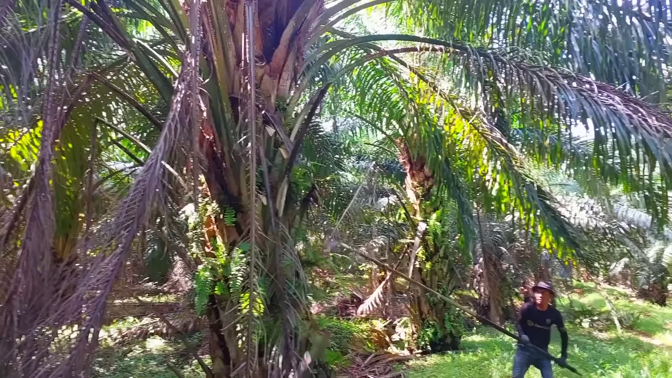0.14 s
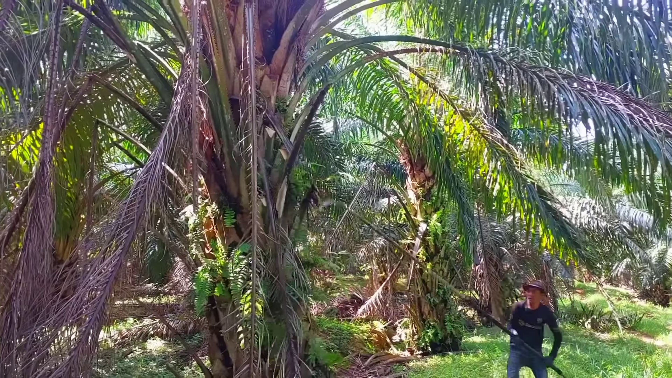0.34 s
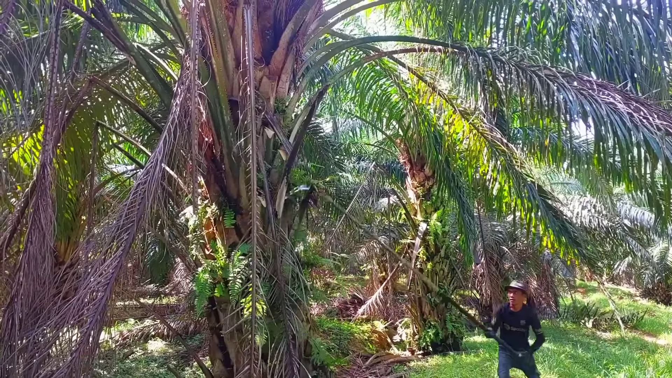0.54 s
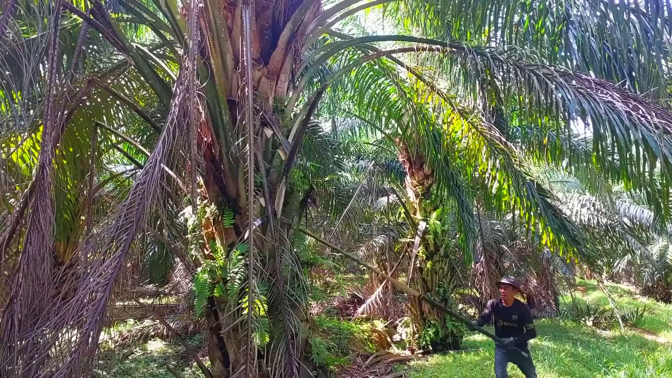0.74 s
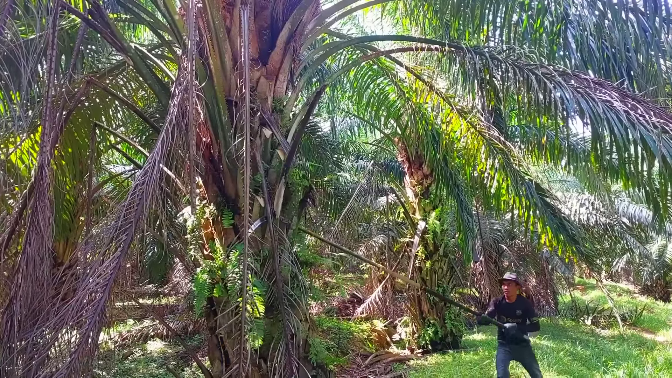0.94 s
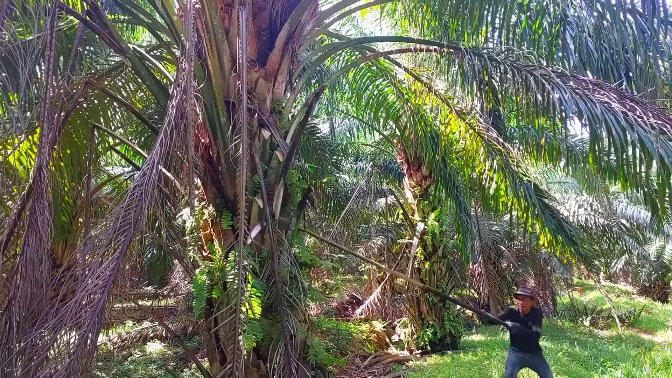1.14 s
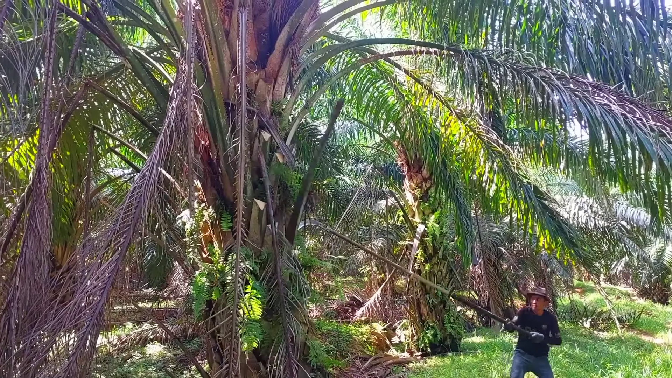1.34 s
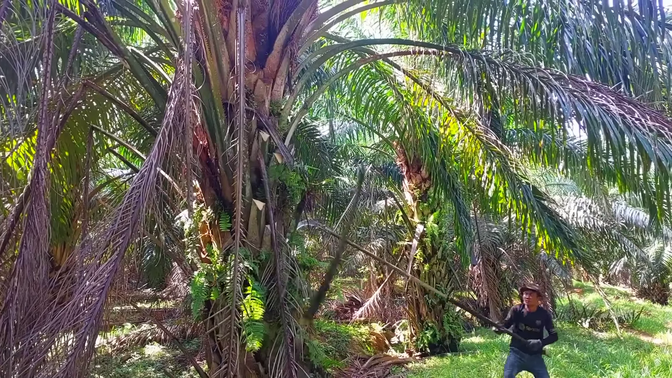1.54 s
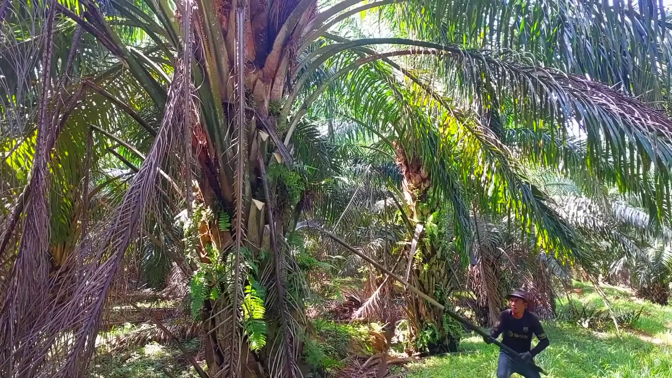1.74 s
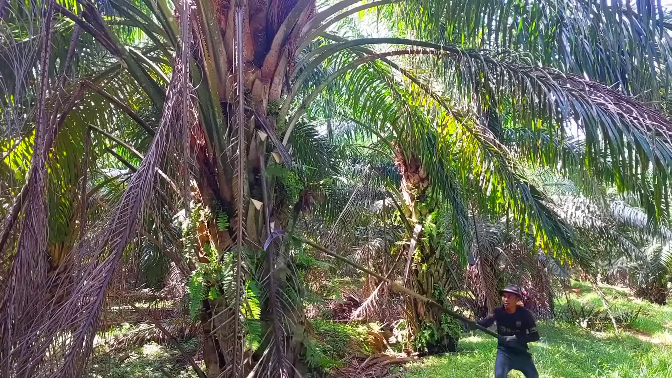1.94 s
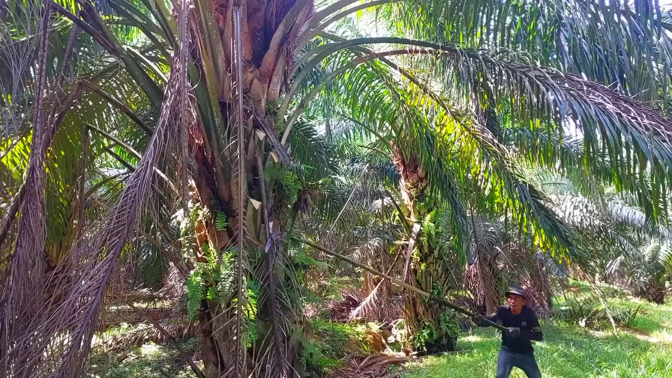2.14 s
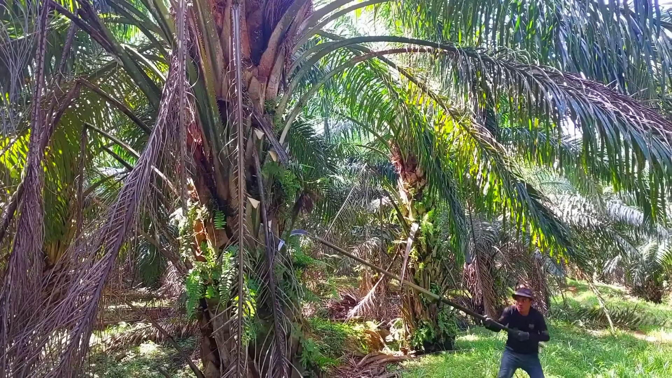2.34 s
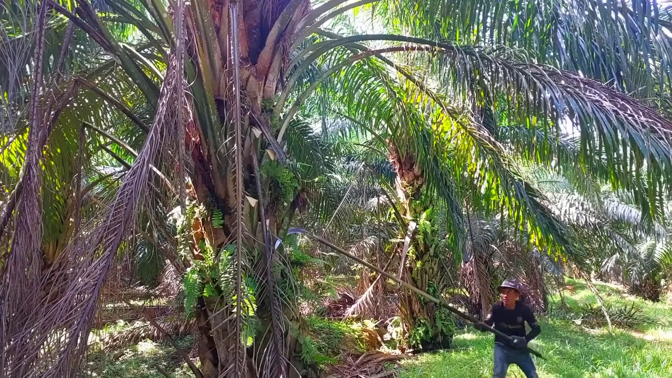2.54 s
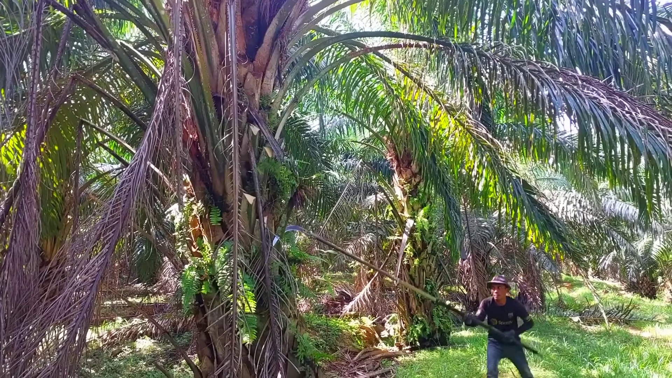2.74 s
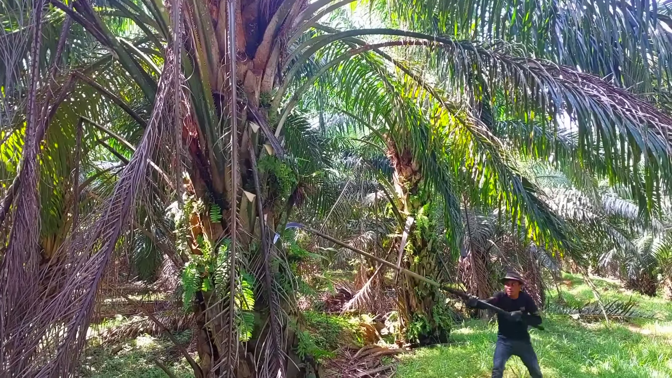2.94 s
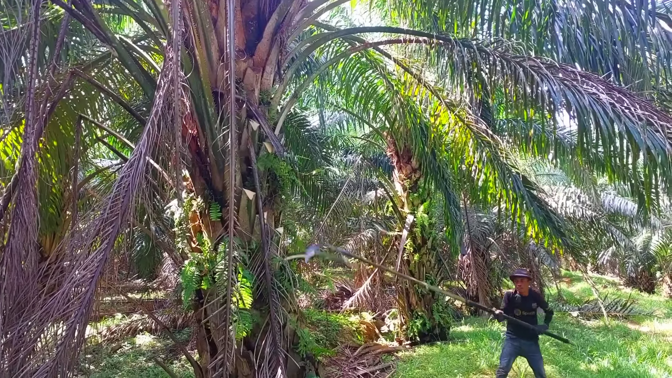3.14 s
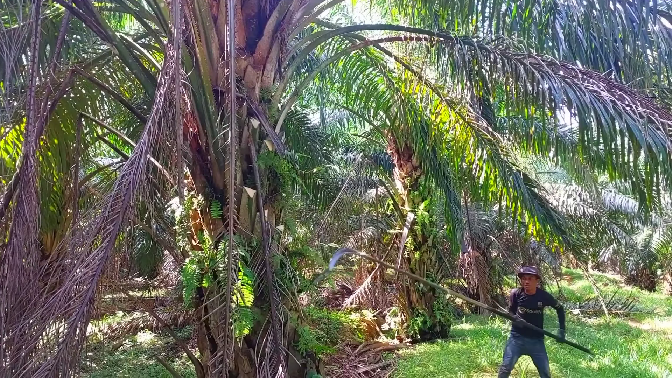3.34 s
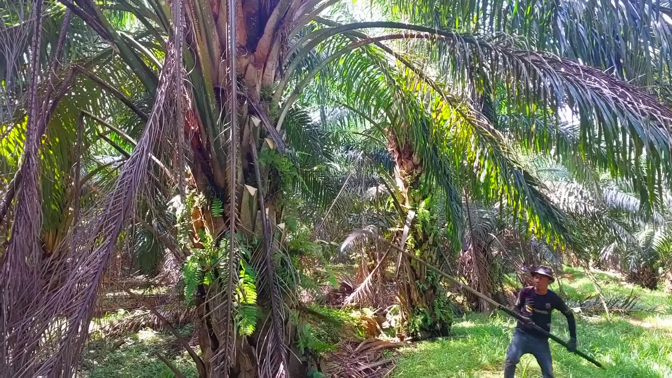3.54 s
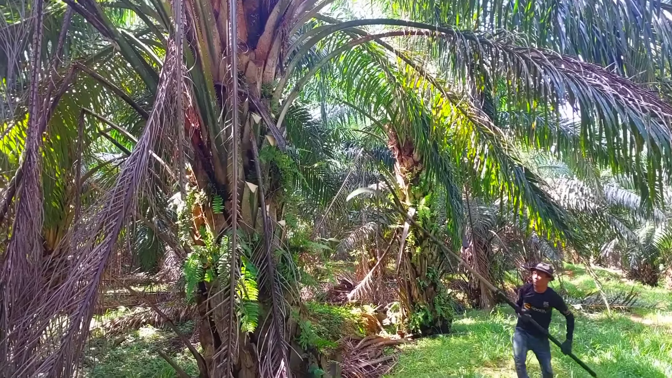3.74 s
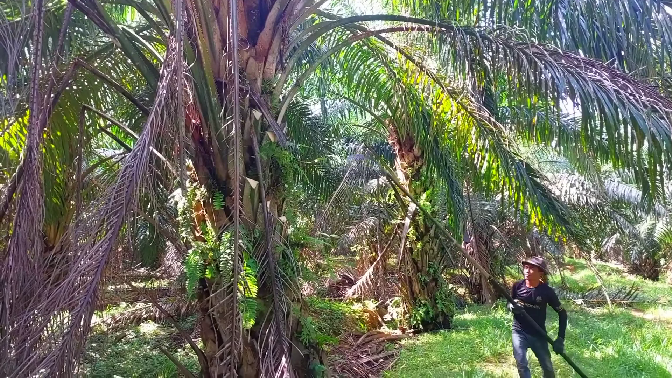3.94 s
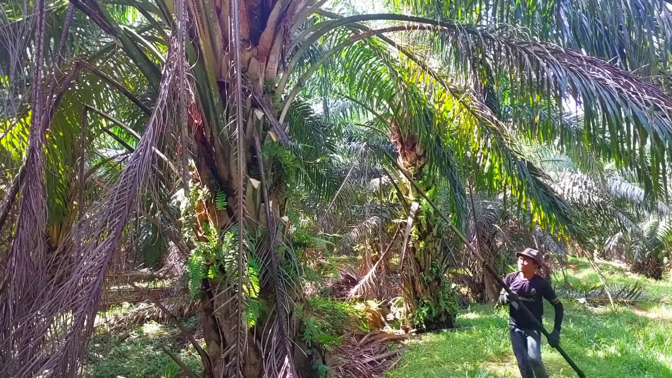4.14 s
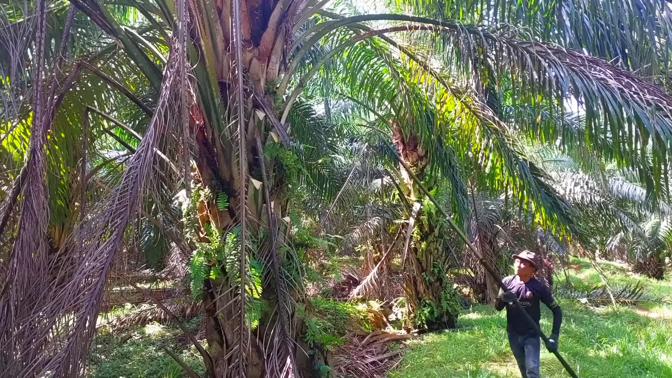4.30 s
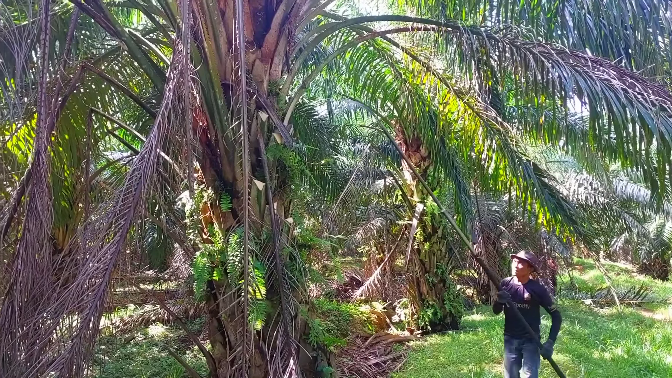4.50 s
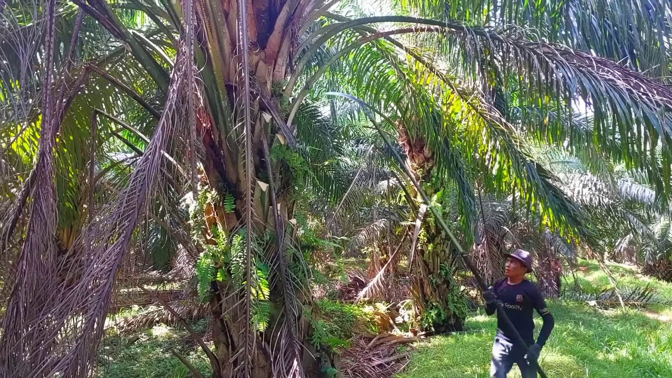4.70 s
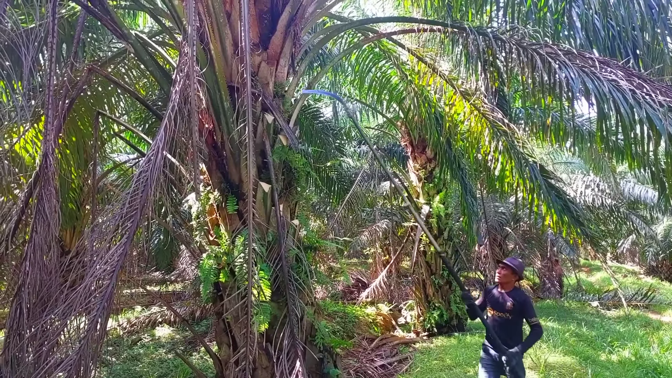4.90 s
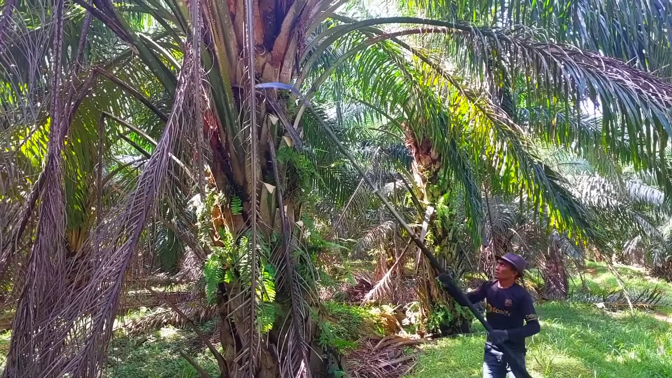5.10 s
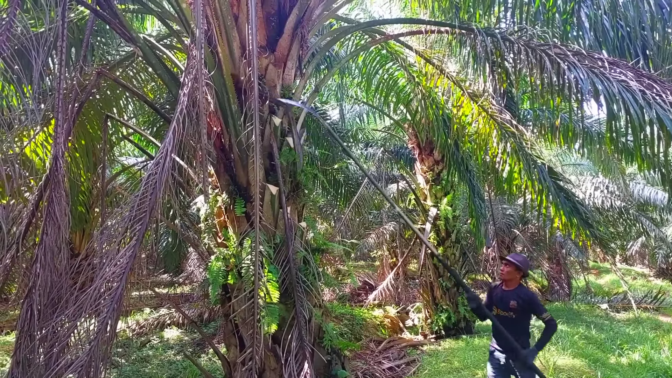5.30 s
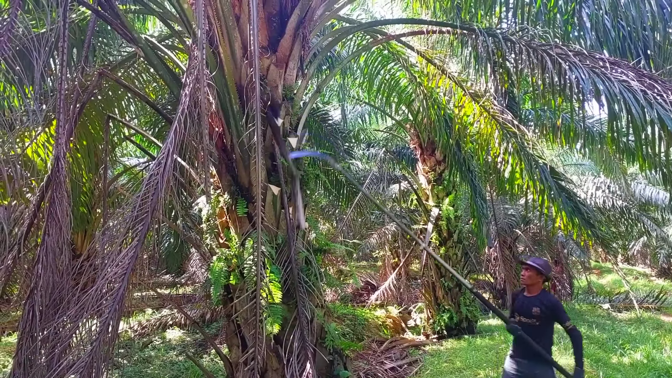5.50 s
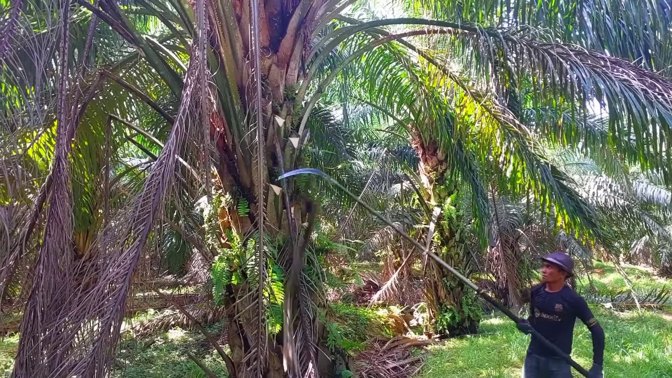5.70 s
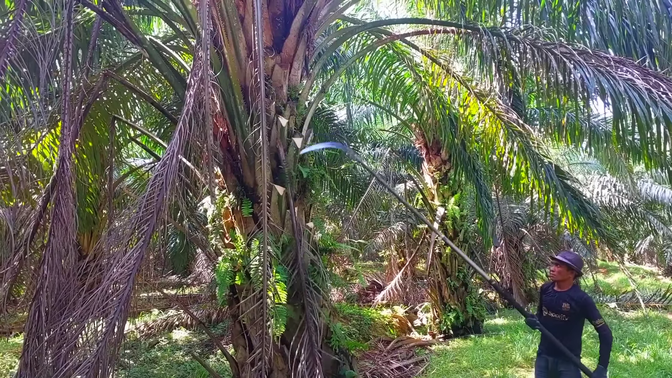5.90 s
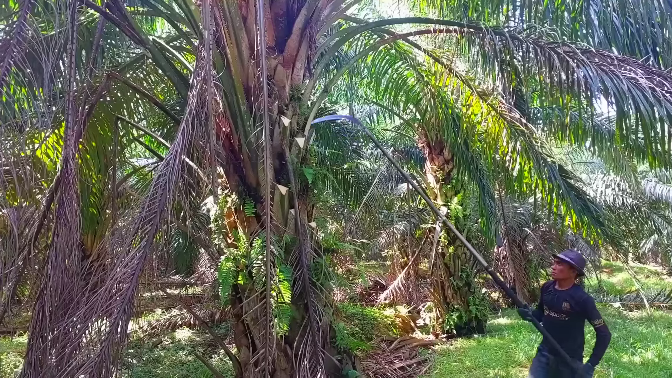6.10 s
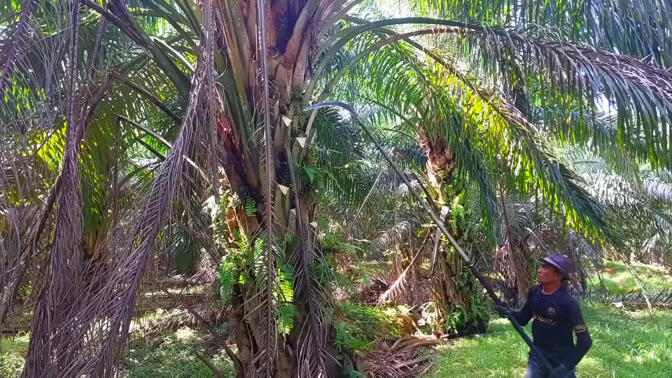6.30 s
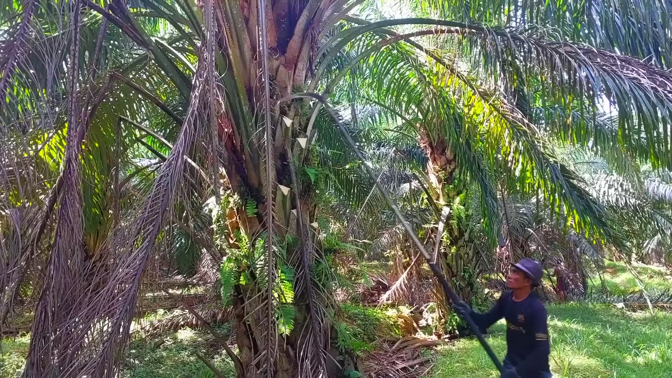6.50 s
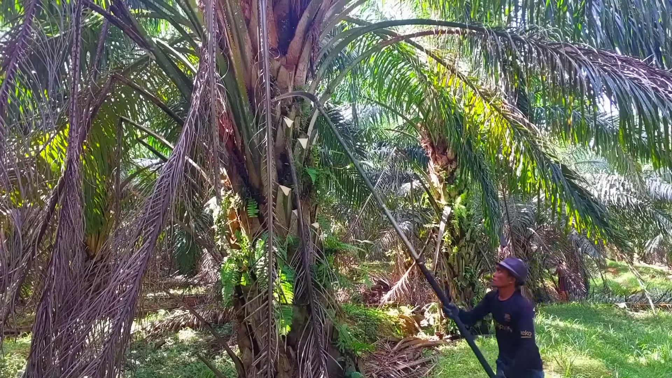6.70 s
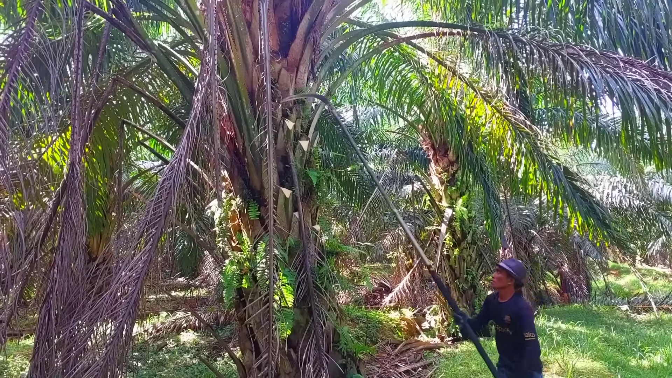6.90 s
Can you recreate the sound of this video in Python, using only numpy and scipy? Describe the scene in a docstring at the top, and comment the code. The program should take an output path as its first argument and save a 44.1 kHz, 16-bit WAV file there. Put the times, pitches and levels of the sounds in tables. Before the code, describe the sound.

A long-pole sickle tears and snaps through dry palm fronds in irregular bursts, with hollow knocks, over shrill insects.

```python
"""A sickle on a long pole cuts fronds from an oil palm, some metres from the microphone.
Each pull tears a run of fibres and shakes dry leaflets; thick bundles snap, stalks knock hollowly,
the blade rings as it strikes and heavy fronds thump. In the pause, feet shuffle faintly.
The grove scatters the sound. Insects shrill all around, the air stirs and an engine drones far off."""
import sys
import numpy as np
from scipy import signal
from scipy.fft import rfft, irfft, next_fast_len
from scipy.io import wavfile
from scipy.ndimage import uniform_filter1d

SR = 44100
rng = np.random.default_rng(int(sys.argv[2]) if len(sys.argv) > 2 else 0)


def wav_record(signal):
    """Record a signal, one row per channel, as 16-bit PCM in the file named by sys.argv[1]."""
    frames = np.transpose(np.atleast_2d(signal))
    bounded = np.clip(frames, -1, 1)
    # unit amplitude maps onto the largest positive 16-bit level
    quanta = np.round(bounded * 32767).astype(np.int16)
    wavfile.write(sys.argv[1], SR, quanta)


N = 306495
TIME = np.arange(N) / SR


def undb(db):
    """Decibels to gain."""
    return 10 ** (np.asarray(db) / 20)


def unit(x):
    """Scale to an rms of 1."""
    return x / np.sqrt(np.mean(x ** 2) + 1e-20)


def decay(t, t60):
    """A fade that falls 60 dB in t60 seconds."""
    return undb(-60 * t / t60)


def gains(points, hz):
    """Gain at hz of (Hz, dB) points joined on a log axis."""
    f, db = np.transpose(points)
    return undb(np.interp(np.log(hz + 1), np.log(f), db))


def walk(rate):
    """A random drift with an rms of 1, gliding to a new value rate times a second."""
    step = max(int(SR / rate), 2)
    held = np.repeat(rng.standard_normal(N // step + 1), step)
    return unit(uniform_filter1d(held, step)[:N])


def crackle(n, rate, spread_db):
    """Two trains of about rate clicks a second, most weak and a few strong."""
    size = undb(spread_db * np.minimum(rng.exponential(size=n), 5))
    return (rng.random(n) < rate / SR) * size * rng.standard_normal((2, n))


def add(out, s, sound):
    """Mix a sound in at s seconds."""
    start = max(int(s * SR), 0)
    out[:, start:start + sound.shape[1]] += sound[:, :N - start]


# Stereo width at the microphone. Each row: frequency in Hz, side against mid in dB.
WIDTH = [(100, -13.5), (280, -13.5), (750, -8.5), (1150, -3.5), (2200, 0), (4500, 0.5), (14000, 0)]
# Balance at the microphone. Each row: frequency in Hz, left over right in dB.
BALANCE = [(200, 0), (700, 0), (1300, 0), (2400, -5), (4400, .5), (8000, -3.5), (15000, -2)]
def colour(pair, spectrum, resonances=()):
    """Shape a mid and side pair into left and right, alike in the bass and apart in the treble."""
    n = pair.shape[1]
    size = 2 * next_fast_len(n // 2 + 512)
    hz = np.fft.rfftfreq(size, 1 / SR)
    gain = gains(spectrum, hz)
    for centre, width, db in resonances:
        gain *= 1 + (undb(db) - 1) / (1 + (2 * (hz - centre) / width) ** 2)
    # minimum phase: resonances ring after the blow, never before
    cepstrum = irfft(np.log(gain))
    cepstrum[1:size // 2] *= 2
    cepstrum[size // 2 + 1:] = 0
    mid, side = rfft(pair, size) * np.exp(rfft(cepstrum))
    side *= gains(WIDTH, hz)
    lean = np.sqrt(gains(BALANCE, hz))
    return irfft(np.array([(mid + side) * lean, (mid - side) / lean]))[:, :n]


def noise(n, spectrum):
    """Stereo noise with the given spectrum and an rms of 1."""
    return unit(colour(rng.standard_normal((2, n)), spectrum))


# The air in the grove. Each row: frequency in Hz, relative level in dB.
AIR_SPECTRUM = [(25, -5), (55, 0.5), (120, 2.5), (200, 0.5), (600, -24), (1300, -25.5), (2300, -3),
                (3800, -39.5), (5000, -34)]
def air(level_db=-69):
    """Faint moving air swells and sinks around the microphone."""
    drift_db = 2.5 * walk(5)
    return noise(N, AIR_SPECTRUM) * undb(level_db + drift_db)


# An engine far off, loudest at the end. Each row: time in seconds, average level in dB.
ENGINE_LEVELS = [(0, -87), (2.4, -69), (4.4, -73), (5.05, -82.5), (6.2, -71.5), (6.26, -57), (6.95, -58.5)]
def far_engine(firing_hz=118, waver=0.019):
    """A distant engine carries as a wavering firing tone and its weak octave."""
    phase = 2 * np.pi * np.cumsum(firing_hz * (1 + waver * walk(37))) / SR
    drone = unit(np.sin(phase) + undb(-19) * np.sin(2 * phase))
    level_db = np.interp(TIME, *np.transpose(ENGINE_LEVELS))
    return drone * undb(level_db + 1.5 * walk(3.3))


# Insects and far foliage on all sides. Each row: frequency in Hz, relative level in dB.
CHORUS_SPECTRUM = [(2500, -37), (3900, -27), (4650, -1), (5300, -5), (6300, -16), (7000, 5), (7450, -1.5),
                   (8100, -23.5), (9500, -23), (11300, -17), (13000, -18.5), (15500, -18.5)]
def insect_chorus(level_db=-54.8, flutter_db=1.77):
    """Far insects merge into one shrill, fluttering hiss."""
    return noise(N, CHORUS_SPECTRUM) * undb(level_db + flutter_db * walk(45))


# One cicada nearer the microphone. Each row: time in seconds, level in dB.
CICADA_LEVELS = [(0, -72.5), (3.6, -76), (3.85, -67), (4.15, -69), (4.5, -81), (6.95, -70)]
def cicada(pitch_hz=4690):
    """A cicada holds one narrow, rough tone."""
    roughness = np.array([walk(220), walk(220)])
    shrill = unit(roughness * np.sin(2 * np.pi * pitch_hz * TIME))
    return shrill * undb(np.interp(TIME, *np.transpose(CICADA_LEVELS)))


# An insect in the grove. Each row: peak time in seconds, relative level in dB, half length in seconds.
BUZZES = [(3.882, -54, 0.024), (4.307, -48.5, 0.027), (4.779, -51.5, 0.074), (5.06, -54.5, .05)]
def insect_buzzes(gain_db=-6):
    """A thin, high buzz comes and goes in short swells."""
    swell = sum(undb(db) * np.exp(-((TIME - s) / half_s) ** 2 / 2) for s, db, half_s in BUZZES)
    buzz = noise(N, [(7000, -20.5), (10000, -10), (11600, -2.5), (13000, -13.5), (15500, -11.5)])
    return swell * undb(gain_db) * buzz


def grove_scatter(source, level_db=-11.5, low_t60_s=0.37, high_t60_s=0.3, onset_s=0.01):
    """Trunks and crowns scatter a thin tail back to the microphone; its treble dies first."""
    t = TIME[:SR]
    low = colour(crackle(SR, 2100, 4.2), [(60, -5), (300, -5), (2300, -3.5), (5000, -11), (15000, -30.5)])
    high = colour(crackle(SR, 5000, 1.2), [(1500, -28.5), (4500, 4.5), (15000, -2)])
    tail = low * decay(t, low_t60_s) + high * decay(t, high_t60_s)
    tail = unit(tail * (1 - np.exp(-t / onset_s))) / np.sqrt(SR)
    return undb(level_db) * signal.fftconvolve(source, tail, axes=1)[:, :N]


# At the palm, a frond jolts the trunk, or frond or pole meets the ground.
# Each row: start in seconds, relative level in dB, pitch in Hz, 60 dB decay time in seconds.
THUMPS = [(0.34, -49, 76, 0.74), (0.72, -42, 63, 0.18), (1.326, -39, 147, 0.14), (1.376, -43, 102, 0.14),
          (1.93, -31, 85.4, 0.11), (2.085, -48, 82, 0.28), (3.72, -34, 82, 0.16), (5.672, -42.5, 93, 0.11),
          (5.901, -37, 148, 0.17)]
def thumps(contact_s=0.0079, gain_db=2):
    """A soft, heavy jolt gives a short low rumble."""
    out, t = np.zeros((2, N)), TIME[:SR // 3]
    attack = 1 - np.exp(-t / contact_s)
    for s, db, hz, t60 in THUMPS:
        rumble = noise(len(t), [(hz / 3, -20), (hz, 0), (hz * 1.7, -8), (hz * 5, -50)])
        add(out, s, undb(db + gain_db) * attack * decay(t, t60) * rumble)
    return out


# Up the pole, the sickle breaks free and strikes. Each row: start in seconds, relative level in dB.
STRIKES = [(3.187, -43), (3.343, -41), (3.364, -40.5)]
# Modes of sickle and pole. Each row: frequency in Hz, relative level in dB, 60 dB decay time in seconds.
SICKLE_MODES = [(430, 13, 0.06), (550, 0, .09), (638, 3, 0.12), (1065, -3, .25), (1480, 3, .16),
                (1840, -2, 0.17), (2490, -11.5, .2), (3036, 0, 0.18), (3780, 1.5, 0.28), (4290, -6, .28),
                (5510, -13.5, .3), (6170, -2, 0.12), (6870, -9, .45)]
def sickle_strikes(contact_s=0.0005, gain_db=2):
    """The steel blade rings briefly, damped by its lashing to the pole."""
    out, t = np.zeros((2, N)), TIME[:SR // 2]
    attack = 1 - np.exp(-t / contact_s)
    for s, db in STRIKES:
        for hz, mode_db, t60 in SICKLE_MODES:
            phase = 2 * np.pi * rng.random() + rng.standard_normal((2, 1)) * gains(WIDTH, hz)
            ring = decay(t, t60) * np.sin(2 * np.pi * hz * t + phase)
            add(out, s, undb(db + mode_db + gain_db) * attack * ring)
    return out


# Stalks and pole knock hollowly; in the pause, faint footsteps shuffle.
# Each row: start in seconds, relative level in dB, pitch in Hz.
KNOCKS = [(0.233, -21.5, 197), (0.646, -31.5, 270), (0.714, -17, 296), (1.258, -22, 370), (1.29, -14, 307),
          (1.477, -27, 295), (1.712, -24.5, 378), (1.743, -26.5, 340), (1.776, -25, 343),
          (1.805, -15.5, 249), (1.881, -21.5, 286), (1.924, -14.5, 310), (2.667, -39, 316),
          (2.928, -39.5, 450), (3.03, -21, 310), (3.111, -31, 334), (3.186, -23, 352), (3.367, -16.5, 432),
          (3.715, -36, 250), (3.724, -27.5, 170), (4.046, -41, 275), (4.271, -47.5, 293), (4.374, -49, 221),
          (4.821, -43.5, 272), (4.867, -39.5, 248), (5.181, -32.5, 235), (5.643, -32, 336),
          (5.667, -35, 310), (5.889, -21.5, 347), (6.046, -19, 254), (6.322, -38, 320), (6.448, -40.5, 279),
          (6.607, -42, 317)]
# Modes of a knock. Each row: multiple of its pitch, relative level in dB, multiple of its decay time.
KNOCK_MODES = [(.42, -16.5, 0.74), (0.741, -8, 0.78), (1.001, -0.5, 1.43), (1.4, -7.5, 1.2),
               (1.9, -18, 0.35), (2.65, -8.5, 0.54)]
# Low rattle and groan. Each row: frequency in Hz, relative level in dB.
GROAN_SPECTRUM = [(25, -36), (55, -4.5), (90, -14.5), (160, -5), (230, -3), (320, 1.5), (430, -5),
                  (620, -7), (1200, -33.5)]
def knocks_and_steps(ring_db=-2, rattle_db=-8, contact_s=0.0022, ring_t60_s=0.055, rattle_t60_s=0.056):
    """A soft blow or footfall sets damped modes going, with a brief rattle."""
    out, t = np.zeros((2, N)), TIME[:SR // 4]
    attack = 1 - np.exp(-t / contact_s)
    for s, db, hz in KNOCKS:
        tilt_db_per_octave = 0.14 * (db + 20.5)  # harder blows reach the higher modes
        ring = 0
        for multiple, mode_db, t60_scale in KNOCK_MODES:
            mode_hz = hz * multiple * (1 + 0.023 * rng.standard_normal())
            sign = rng.choice([-1, 1])  # where the blow lands decides which way a mode starts
            size = sign * undb(mode_db + tilt_db_per_octave * np.log2(multiple))
            ring += size * decay(t, ring_t60_s * t60_scale) * np.sin(2 * np.pi * mode_hz * t)
        rattle = noise(len(t), GROAN_SPECTRUM) * decay(t, rattle_t60_s)
        add(out, s, undb(db) * attack * (undb(ring_db) * ring + undb(rattle_db) * rattle))
    return out


# Thick fibre bundles snap in the cut. Each row: start in seconds, relative levels of crack and
# splinters in dB, pitch in Hz, 60 dB decay time in seconds.
SNAPS = [(0.1877, -33, -44, 980, 0.06), (0.2346, -28.5, -45, 2160, 0.15), (0.2513, -20, -25, 1640, 0.064),
         (0.3329, -14, -24.5, 2510, 0.017), (0.379, -24.5, -29, 2430, 0.019),
         (0.4016, -31.5, -50, 2010, .02), (0.4538, -40, -30, 2390, 0.011), (0.4927, -35, -39, 2300, 0.027),
         (0.711, -32.5, -32.5, 2730, 0.12), (1.2595, -18, -30, 710, 0.023),
         (1.308, -15.5, -18, 2770, 0.021), (1.423, -57.5, -42, 2890, 0.15), (1.714, -41, -69, 794, 0.2),
         (1.7922, -23, -31, 2370, 0.018), (1.8119, -15.5, -22.5, 2480, 0.032),
         (1.835, -19.5, -48.5, 863, 0.037), (1.8659, -32, -17, 1940, 0.012),
         (1.9064, -22, -26.5, 2820, 0.018), (1.9115, -28, -13, 2900, 0.014), (1.925, -21, -32, 775, 0.048),
         (2.2407, -24.5, -24.5, 1970, 0.013), (2.298, -29, -44, 1870, .024),
         (2.931, -48.5, -73.5, 780, 0.19), (2.995, -44.5, -74.5, 774, 0.13), (3.1861, -22, -28, 2850, 0.04),
         (3.3424, -23.5, -25.5, 860, 0.027), (3.3606, -19.5, -31, 1260, 0.039),
         (3.7168, -52, -52, 737, 0.19), (4.045, -45, -55, 2430, 0.065), (5.1789, -38, -42, 1940, 0.027),
         (5.2325, -40, -42, 1950, 0.04), (5.876, -33, -24, 2300, 0.076), (5.892, -9, -30, 1470, 0.013),
         (6.0464, -34.5, -44, 595, 0.062), (6.135, -46.5, -45, 2300, 0.15), (6.3185, -39.5, -44, 2160, .04),
         (6.325, -26, -31.5, 1970, 0.013), (6.463, -42, -58, 1380, 0.037), (6.594, -49, -43, 2790, 0.069),
         (6.7807, -46, -54, 1860, 0.08)]
# Resonances of the cut wood. Each row: centre in Hz, width in Hz, boost in dB.
WOOD_RESONANCES = [(842, 120, 4), (1420, 14, 3), (1720, 24, 1.5), (2424, 840, 6), (2880, 220, 3)]
# The crack, then dry leaflets and splinters. Each row: frequency in Hz, relative level in dB.
CRACK_SPECTRUM = [(60, -7.5), (250, -16.5), (700, -1.5), (1200, -5), (2400, -5), (3400, -16), (5500, -15),
                  (14000, -31.5)]
LEAFLET_SPECTRUM = [(1500, -27.5), (3000, -2), (3900, -1), (5100, 0.5), (6200, -2.5), (8300, -8.5),
                    (11300, -4), (13500, -8), (16000, -15)]
def bundle_snaps(gain_db=4, ring_db=11, relative_width=0.34, break_db=3, break_s=0.0032):
    """A bundle gives way: one sharp break, then an avalanche that rings the wood and spits splinters."""
    out, t = np.zeros((2, N)), TIME[:SR // 8]
    for s, crack_db, splinter_db, hz, t60 in SNAPS:
        avalanche = undb(break_db) * np.exp(-t / break_s) + decay(t, t60)
        resonances = WOOD_RESONANCES + [(hz, relative_width * hz, ring_db)]
        crack = colour(crackle(len(t), 13000, 0.72) * avalanche, CRACK_SPECTRUM, resonances)
        # each snap's splinters ring through a few broad, dry resonances at random pitches
        slivers = [(sliver_hz, 450, 6) for sliver_hz in rng.uniform(3000, 13000, size=5)]
        splinters = colour(crackle(len(t), 9000, 1) * avalanche, LEAFLET_SPECTRUM, slivers)
        burst = undb(crack_db) * unit(crack) + undb(splinter_db) * unit(splinters)
        energy = t60 / (np.log(10 ** 6) * t[-1])  # a longer avalanche carries more
        add(out, s, undb(gain_db) * np.sqrt(energy) * burst)
    return out


def pings(rate, low_hz, high_hz, cycles, spread_db):
    """Strands or leaflets ping at random, each at its own pitch, dying 60 dB over the given cycles."""
    out, t = np.zeros((2, N)), TIME[:SR // 40]
    for when, pitch, rank, side in rng.random((int(rate * N / SR), 4)):
        hz = low_hz * (high_hz / low_hz) ** pitch
        ring = np.sin(2 * np.pi * hz * t) * decay(t, cycles / hz)
        size = undb(-spread_db * np.log(rank + 0.03))
        mid_side = [1, np.sqrt(12) * (side - 0.5)]
        add(out, when * N / SR, size * np.outer(mid_side, ring))
    return out


# Leaves never hang quite still. In order: relative levels of rubbing, hiss and groan in dB.
REST_DB = (-74.5, -69.5, -83.5)
# Soft swells of rustling: fronds sway and brush, and feet shuffle faintly in the pause.
# Each row: peak time and half length in seconds, relative levels of rubbing, hiss and groan in dB.
RUSTLES = [(0.01, 0.048, -58.5, -60, -58.5), (0.199, 0.037, -45.5, -40.5, -44),
           (0.63, 0.018, -59, -64, -46), (0.873, 0.035, -61, -78, -48), (0.98, 0.024, -55.5, -70, -54),
           (1.501, 0.055, -42.5, -42.5, -44.5), (1.679, 0.026, -49, -47, -46.5),
           (2.41, 0.043, -46.5, -44, -47), (2.673, 0.014, -55, -66, -46), (3.269, 0.043, -44.5, -38.5, -48),
           (3.793, 0.051, -63.5, -57, -68), (4.06, 0.074, -59, -53, -60), (4.44, 0.092, -76, -70.5, -65),
           (4.788, 0.048, -63.5, -58.5, -65.5), (5.6, .07, -63.5, -53.5, -80),
           (6.095, 0.076, -47.5, -47, -52.5), (6.335, 0.085, -57.5, -52, -59.5), (6.8, 0.11, -70, -65, -74)]
# The blade is pulled through a stalk. Each row: start, rise and hold in seconds, relative levels
# of tearing, hiss and groan in dB, stir afterwards in dB against the pull.
PULLS = [(0.228, 0.02, 0.1, -33, -30.5, -39.5, -15), (0.643, .003, .005, -39, -42.5, -38, -13.5),
         (0.694, 0.019, 0.011, -38.5, -38.5, -35, -16.5), (1.182, 0.064, 0.065, -26.5, -28.5, -35.5, -21),
         (1.778, 0.037, 0.011, -23, -25.5, -30, -17.5), (1.895, 0.01, 0.019, -29.5, -30, -25, -17.5),
         (2.223, 0.059, 0.012, -33.5, -35, -34, -13), (3.014, 0.027, 0.062, -31, -26.5, -35, -26.5),
         (3.172, .005, 0.024, -36, -34.5, -59, -23.5), (3.299, 0.059, 0.02, -31.5, -35.5, -32, -33),
         (5.179, 0.0023, 0.0064, -41.5, -44, -42, -27), (5.23, .012, 0.0082, -37.5, -31, -38.5, -32),
         (5.285, 0.019, 0.044, -35, -37.5, -40.5, -17.5), (5.638, 0.002, 0.0033, -41, -40.5, -35, -22),
         (5.832, 0.0047, .015, -44.5, -35.5, -67, -23.5), (5.872, 0.012, 0.075, -30.5, -26.5, -40, -20),
         (6.584, 0.0041, 0.012, -49.5, -45, -50.5, -12)]
def motion(release_db_per_s=230.5, stir_db_per_s=49.5):
    """Gains of tearing, hiss and groan: each pull bites, holds and dies fast; the frond stirs on."""
    power = np.outer(undb(REST_DB), np.ones(N)) ** 2
    for s, rise_s, hold_s, *parts_db, stir_db in PULLS:
        bite = np.clip((TIME - s) / rise_s, 0, 1)
        since_release = np.maximum(TIME - s - rise_s - hold_s, 0)
        release = undb(-release_db_per_s * since_release)
        stir = undb(stir_db - stir_db_per_s * since_release)
        power += np.outer(undb(parts_db), bite * np.hypot(release, stir)) ** 2
    for s, half_s, *parts_db in RUSTLES:
        swell = np.exp(1 - np.hypot(1, (TIME - s) / half_s))
        power += np.outer(undb(parts_db), swell) ** 2
    return np.sqrt(power)


# Tearing fibres, some metres from the microphone. Each row: frequency in Hz, relative level in dB.
TEAR_SPECTRUM = [(200, -28.5), (450, -17), (700, -4.5), (1150, -3), (2400, -1), (3400, -8), (5000, -32.5),
                 (12000, -53.5)]
def pulls_and_rustles(jerk_db=2, jerks_per_s=150, settle_s=0.048):
    """The blade sticks and slips through fibres; leaflets hiss and tick, and the stalk groans below."""
    tear_gain, leaf_gain, groan_gain = motion()
    slip = undb(jerk_db * walk(jerks_per_s))
    tear = colour(crackle(N, 6000, 1.9) * slip, TEAR_SPECTRUM, WOOD_RESONANCES)
    strands = colour(pings(260, 596.3, 3300, cycles=63, spread_db=3.5), TEAR_SPECTRUM, WOOD_RESONANCES)
    hiss = colour(crackle(N, 11000, 1.8) * np.sqrt(slip), LEAFLET_SPECTRUM)
    ticks = colour(pings(300, 3600, 11000, cycles=23, spread_db=5.6), LEAFLET_SPECTRUM)
    groan = colour(crackle(N, 2500, 0.66) * slip, GROAN_SPECTRUM)
    # shaken leaflets go on tapping each other as they settle
    lag = np.exp(-1 / (settle_s * SR))
    tick_gain = signal.lfilter([1 - lag], [1, -lag], leaf_gain)
    return (tear_gain * (undb(-2) * unit(tear) + undb(-4) * unit(strands))
            + leaf_gain * undb(-1) * unit(hiss)
            + tick_gain * undb(-10) * unit(ticks)
            + groan_gain * undb(-4) * unit(groan))


def scene():
    """From the microphone: the harvester some metres off, the grove all around, the engine far away."""
    harvest = pulls_and_rustles() + bundle_snaps() + knocks_and_steps() + thumps() + sickle_strikes()
    scatter = grove_scatter(harvest)
    insects = insect_chorus() + cicada() + insect_buzzes()
    return harvest + scatter + insects + air() + far_engine()


def record(dry, ceiling=0.75, low_cut_hz=42, top_hz=15450):
    """The recorder rounds the loudest peaks, thins the deep bass and cuts the top."""
    rounded = ceiling * np.tanh(dry / ceiling)
    thinned = signal.sosfilt(signal.butter(2, low_cut_hz, "high", fs=SR, output="sos"), rounded)
    return signal.sosfilt(signal.ellip(8, 0.2, 70, top_hz, fs=SR, output="sos"), thinned)


dry = scene()
out = record(dry)
wav_record(out)
```